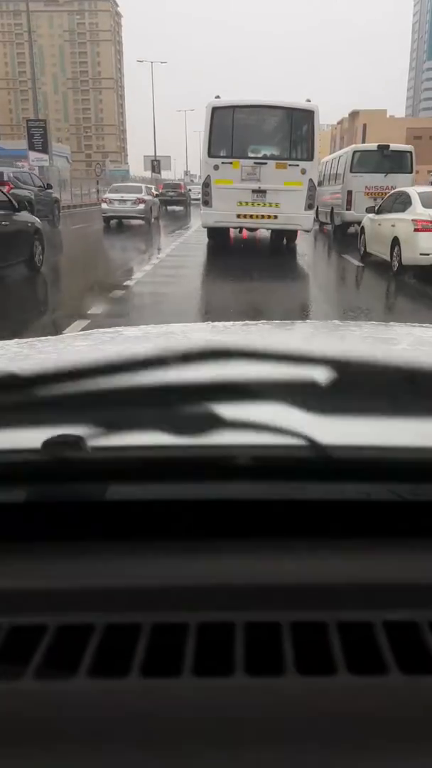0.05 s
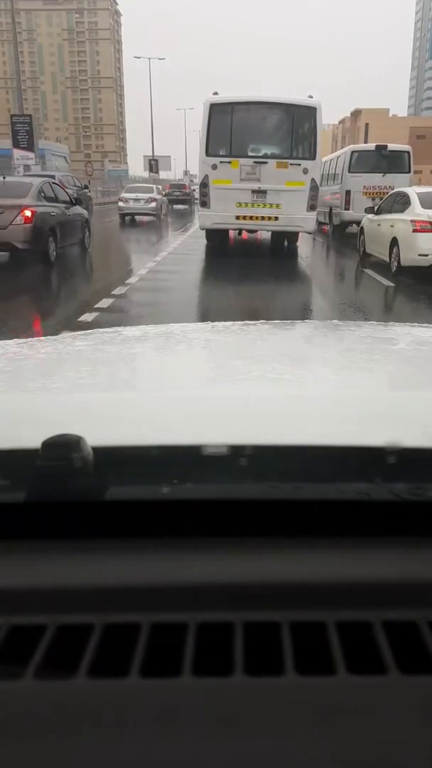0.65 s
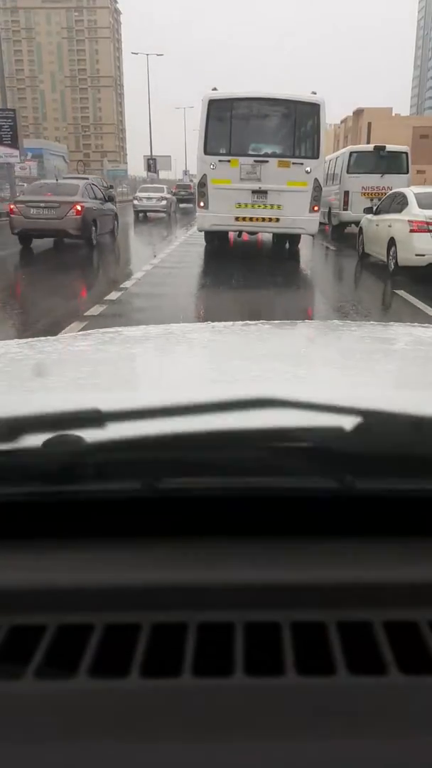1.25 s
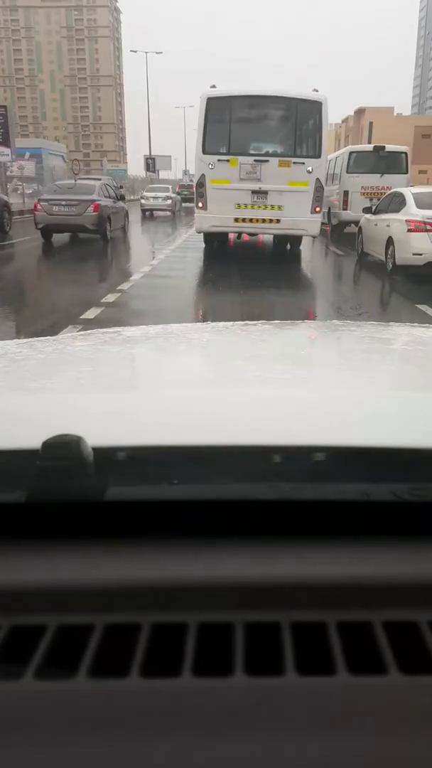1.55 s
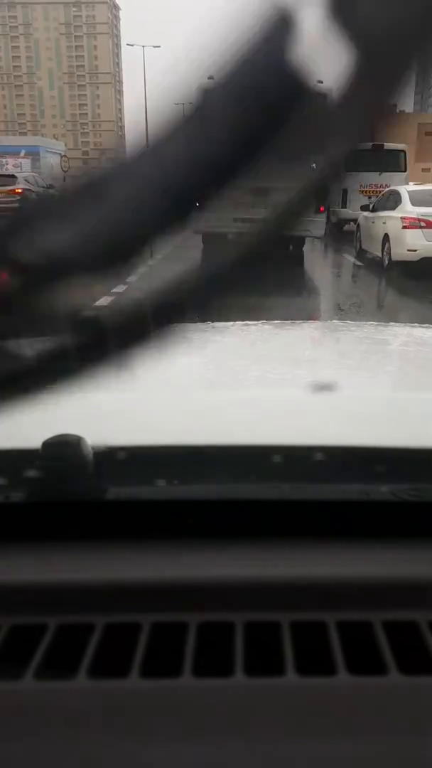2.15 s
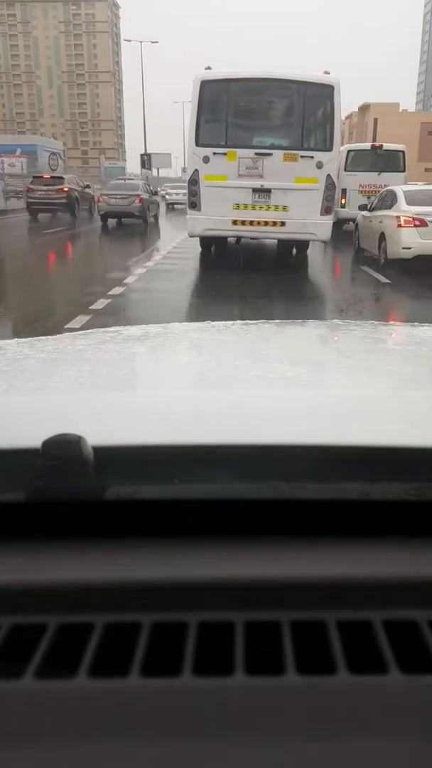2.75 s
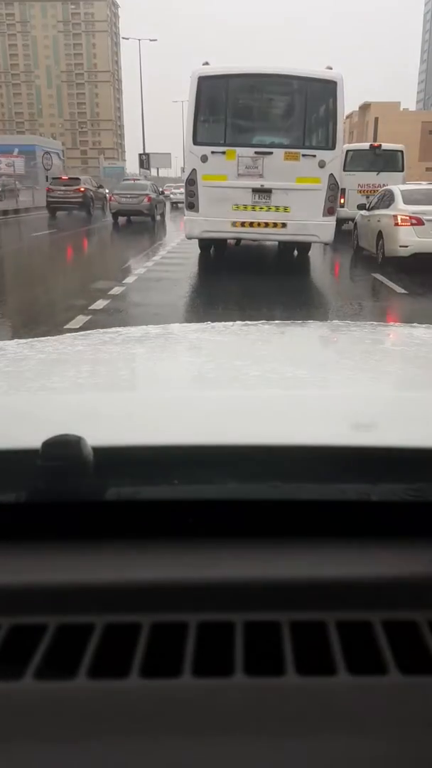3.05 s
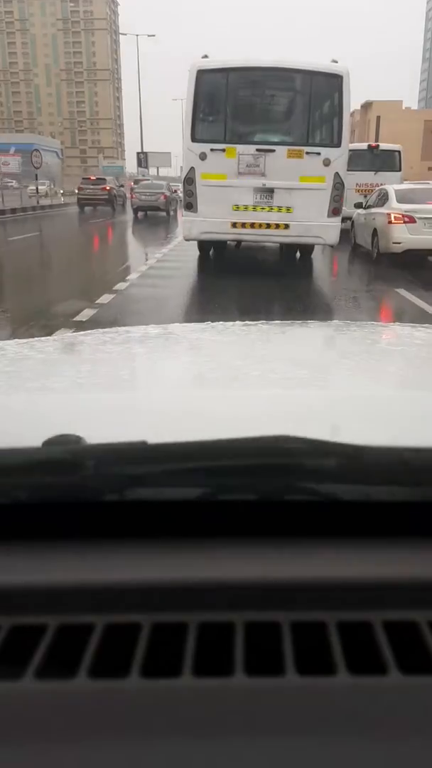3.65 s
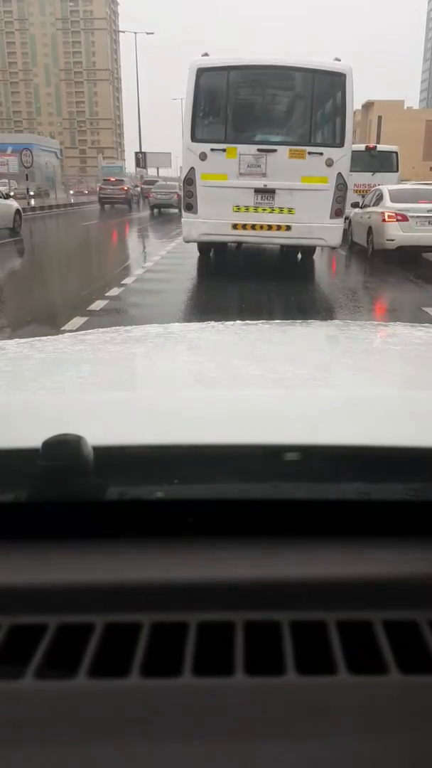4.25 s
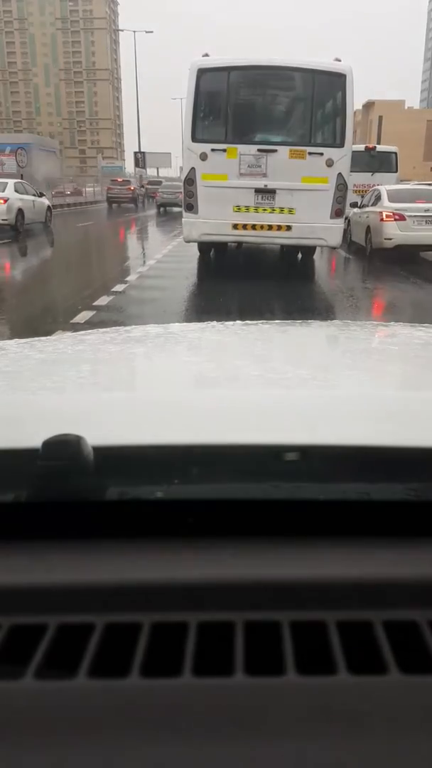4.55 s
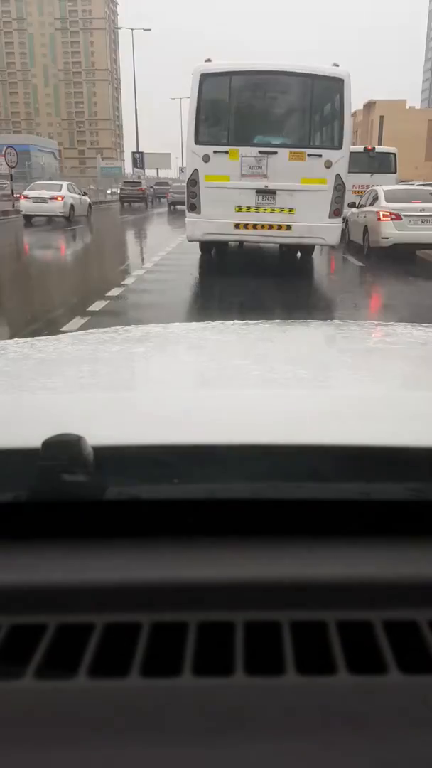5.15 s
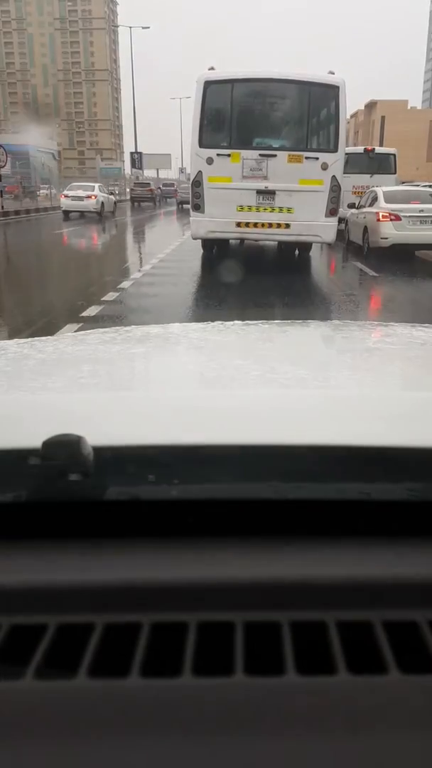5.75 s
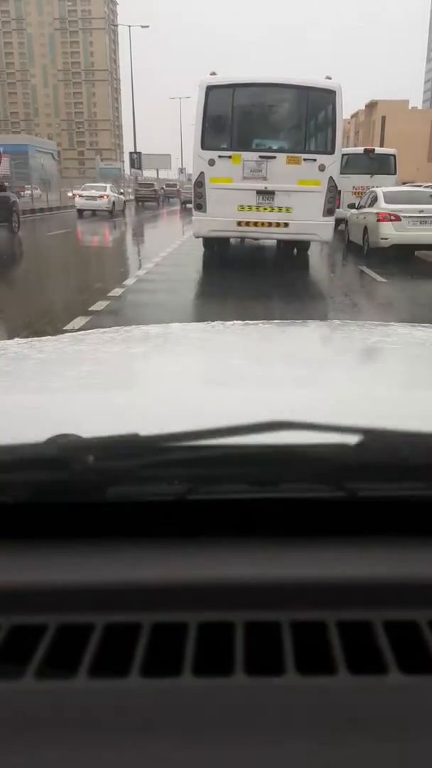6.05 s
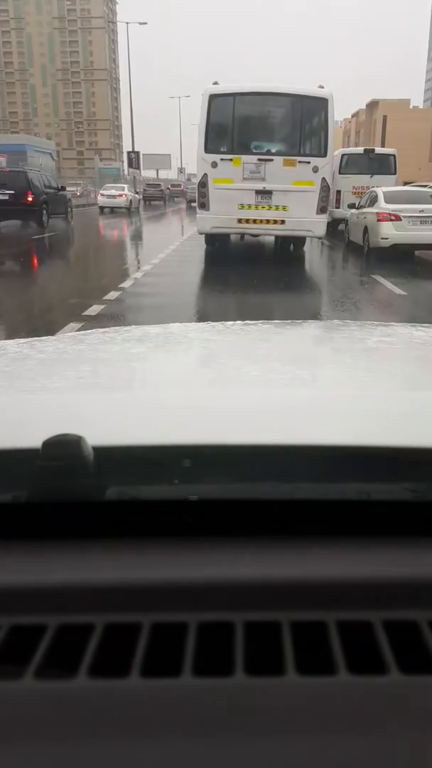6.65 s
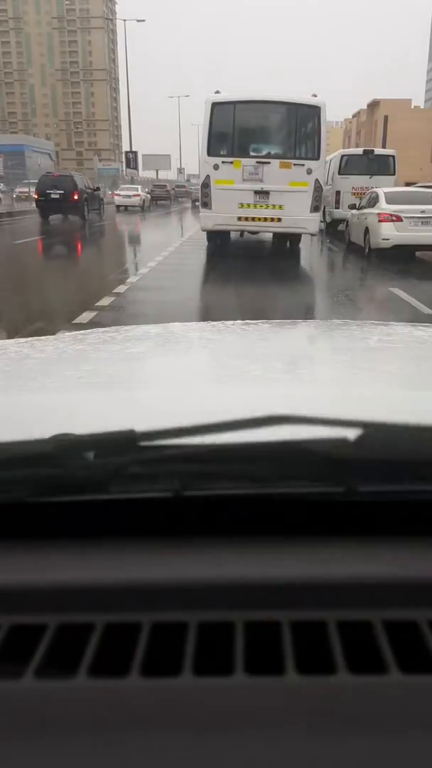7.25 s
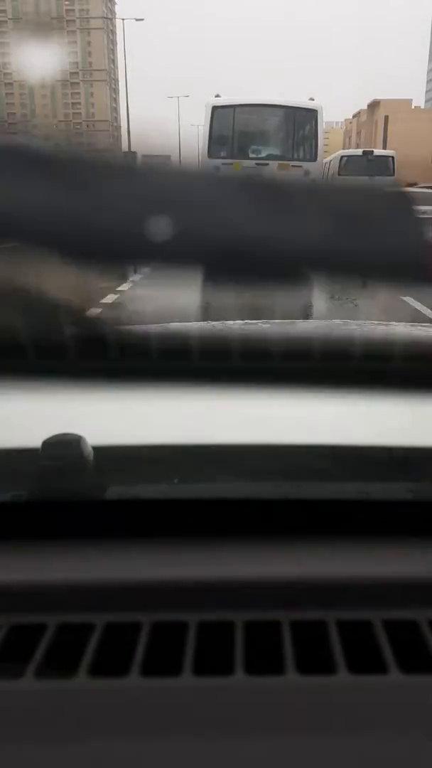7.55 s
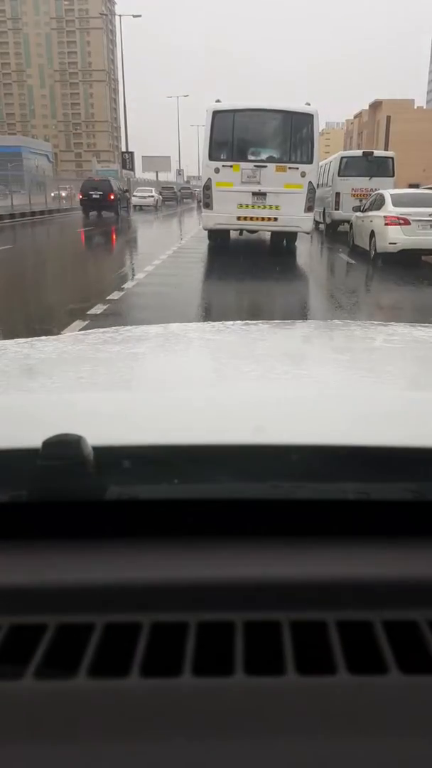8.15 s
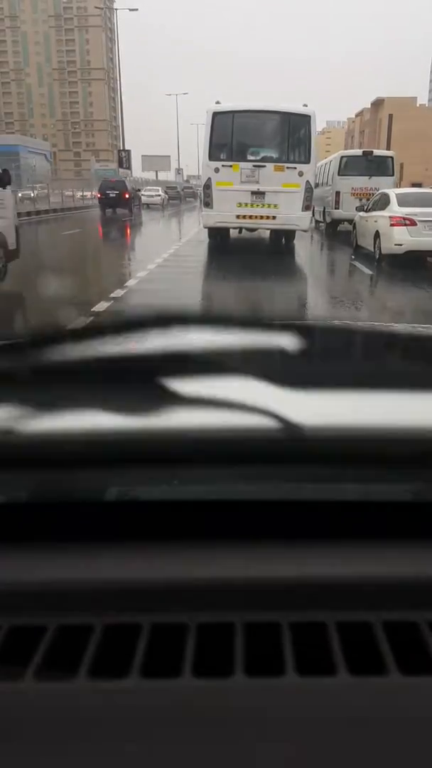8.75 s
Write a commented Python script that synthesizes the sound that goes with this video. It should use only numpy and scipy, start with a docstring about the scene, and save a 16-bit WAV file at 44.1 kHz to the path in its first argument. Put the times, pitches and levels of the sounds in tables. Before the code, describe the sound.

Inside a car creeping through rainy traffic, windscreen wipers swing steadily, with a tick and two knocks at the top of each sweep and a soft double thump at the bottom. Rain washes over the roof and single drops tick on the glass. Early on, plastic clacks sharply twice, then two heavy drops strike with a low ring. A deep rumble, tyre roar and faint whine run underneath, all heard from the dashboard.

```python
"""Windscreen wipers swing every 1.24 s, heard at the dashboard of a car creeping through rainy traffic.
Their rubber blades flip over and push on the glass: a tick and two knocks at the top of each sweep,
a soft double thump at the bottom. Rain washes over roof and glass, and single drops tick close by.
Plastic clacks sharply twice, then two heavy drops strike the car with a low ring.
Underneath, the car body booms on the road, the tyres roar and the drivetrain whines faintly."""
import sys
import numpy as np
from scipy import signal
from scipy.fft import rfft, irfft, next_fast_len
from scipy.io import wavfile

SR = 44100
rng = np.random.default_rng(int(sys.argv[2]) if len(sys.argv) > 2 else 0)


def int16_out(signal):
    """Quantize to a 16-bit WAV file."""
    q = np.round(np.clip(np.atleast_2d(signal).T, -1, 1) * 32767)
    wavfile.write(sys.argv[1], SR, q.astype(np.int16))


N = 392931
TIME = np.arange(N) / SR

# Levels in the tables are relative. A t60 is the time a sound takes to die away by 60 dB.
# one row per sweep: linkage tick/dB, force of first blade/dB, of second blade/dB,
# force at the bottom/dB, lag of second blade/s
SWEEPS = [(-30, -1, 0.5, -1.5, .085), (-27.5, 0.5, 2, -1, .083), (-33, -1, .5, 0, .091),
          (-29, -1, -2, -1, .084), (-28.5, 1, 0, 1, .087), (-29, 1, 0.5, -0.5, .085),
          (-32.5, -3, -1, -2.5, .086)]
# notes the windscreen and the panel below it ring at: f/Hz, t60/s, top push/dB, bottom push/dB
SCREEN_NOTES = [(79, 0.17, -1.5, -0.5), (110.1, 0.24, 4, -1.5), (136.5, 0.24, 0, 0.5),
                (162.3, 0.13, -1.5, -1), (231.3, 0.24, -8.5, -13), (304, 0.26, -5.5, -13),
                (352, 0.099, -17, -0.5), (406, 0.046, -49, -20), (592, 0.069, -4.5, -24),
                (706, 0.12, -2, -8)]
# tone colours, or how strong a noise is from bass to treble: f/Hz, level/dB
TICK_TONE = [(300, 2), (1200, -0.5), (2200, -3), (3000, -3), (4200, -7), (7000, -21), (15000, -34)]  # wiper linkage
SLAP_TONE = [(60, 14), (150, 6), (330, 3), (550, -5), (800, -17.5), (1400, -16), (3000, -33), (9000, -56)]  # blade flipping over
RUB_TONE = [(100, 6), (200, -1.5), (380, 0), (600, -8), (800, -16), (1200, -18.5), (4000, -64)]  # wet rubber on glass
WASH_TONE = [(200, -27), (600, -2), (1100, -0.5), (1800, -1.5), (2700, 0), (3600, -4), (5000, -10.5),
             (7000, -18.5), (15000, -21)]  # rain on the roof
SPRAY_TONE = [(1000, -21), (4000, 2), (7000, 1.5), (10000, -1), (13000, 1), (16000, -25)]  # fine rain on the glass
TAP_TONE = [(200, 16), (700, 0), (1600, 4.5), (3000, -0.5), (5000, -9.5), (8000, -17.5), (15000, -28)]  # drop striking
SPATTER_TONE = [(1000, -22), (4500, 8), (7500, 0), (10500, 1.5), (16000, 2.5)]  # drop bursting
TINK_TONE = [(2000, -38), (7500, -16), (11000, -3), (16000, -5)]  # tiny droplet
TYRE_TONE = [(20, -11), (45, -9), (75, 4.5), (92, -0.5), (108, 2), (150, -9.5), (230, -10), (300, -16),
             (400, -19), (560, -26), (900, -28.5), (1500, -49.5), (3000, -93)]  # tyres on the wet road
# pitches that a part rings at and makes louder: f/Hz, width/Hz, boost/dB
LINKAGE_RINGS = [(2580, 220, 10), (3060, 340, 9.5), (3750, 240, 0)]
ARM_RINGS = [(510, 130, 1.5), (820, 110, 4.5)]  # hollow wiper arms
PANEL_RINGS = [(870, 14, 9), (1104, 85, 4), (1446, 550, 4.5), (1906, 62, 5), (2237, 25, 7),
               (2580, 110, 5.5), (3280, 500, 2.5)]  # glass and roof under the rain
GLASS_RING = [(4650, 390, 1.5)]  # windscreen under a close drop
# strength of the rain on the roof and on the glass: t/s, level/dB
WASH_LEVEL = [(0.0, -50), (2.38, -51), (2.73, -51.5), (3.05, -49.5), (7.84, -53), (8.19, -51),
              (8.91, -51.5)]
SPRAY_LEVEL = [(0.0, -65), (0.62, -67), (1.71, -61.5), (2.53, -65.5), (4.05, -63.5), (4.62, -70.5),
               (6.4, -72), (7.02, -67.5), (8.91, -68.5)]
# big drops on the glass: t/s, spatter/dB, tap/dB
BIG_DROPS = [(0.138, -49, -62), (0.463, -50, -59), (0.5262, -43, -47), (0.649, -42, -47.5),
             (0.85, -39.5, -43.5), (1.3852, -39.5, -43.5), (1.4902, -37, -41), (2.9462, -38, -40.5),
             (3.2117, -43, -45.5), (3.7902, -43, -43.5), (5.17, -48, -45), (5.9372, -53, -43),
             (6.5164, -48, -46), (6.8558, -47, -53), (7.8427, -58, -47.5), (8.297, -46, -45)]
# heavy drops with a longer splash: t/s, tap/dB, spatter/dB
SPLASHES = [(2.344, -34.5, -43), (2.398, -37.5, -46), (2.478, -44.5, -44.5), (2.668, -39, -52),
            (3.039, -37, -34.5)]
# tiny droplets: t/s, level/dB, f/Hz
TINKS = [(1.428, -43, 9900), (1.515, -44, 12900), (6.982, -37, 11300), (7.213, -44, 10300)]
# two plastic clacks, then the low ring of two heavy drops: t/s, level/dB, f/Hz, muffled above/Hz, t60/s
CLACKS_AND_DROP_RINGS = [(2.106, -26, 2540, 9000, 0.034), (2.159, -26.5, 2130, 2880, 0.031),
                         (3.046, -41.5, 1200, 2500, 0.35), (3.215, -44.5, 860, 3000, 0.23)]
# slow swell of the body's boom: t/s, level/dB
BOOM_LEVEL = [(0, -20), (0.35, -30), (1.1, -20.5), (1.65, -28.5), (2.05, -21), (2.75, -27.5), (3.1, -23),
              (4.1, -24.5), (4.6, -20), (5.7, -24), (6.05, -24), (6.7, -22), (7.4, -24), (8.1, -21),
              (8.5, -28.5), (8.91, -24)]
# pitch of the boom: t/s, f/Hz
BOOM_PITCH = [(0, 49.6), (1.2, 47.8), (3.6, 49.3), (4.7, 42.5), (6.7, 42.7), (7.5, 52.1), (8.91, 50.7)]
# moments when the boom holds one steady note: t/s, length/s, f/Hz, level/dB
DRONES = [(0.622, 0.34, 45.24, -18.5), (6.841, 0.318, 44, -16)]
# glides of the drivetrain whine: t/s, length/s, first f/Hz, last f/Hz, level/dB
WHINE_GLIDES = [(-.1, 0.56, 255, 240, -40.5), (2.6, 0.504, 429, 395, -46), (3.632, 0.42, 345, 385, -42.5),
                (4.582, .5, 468, 345, -42), (7.051, .75, 212, 248.4, -39.5), (7.75, .9, 252, 232, -43)]
# how alike left and right sound: f/Hz, likeness (1 = the same, 0 = unrelated)
STEREO_LIKENESS = [(40, 0.94), (80, 0.59), (130, 0.92), (290, 0.94), (640, 0.97), (1100, 0.013),
                   (3000, -0.053), (15000, -0.011)]
# balance of the microphone's two openings: f/Hz, left minus right/dB
STEREO_BALANCE = [(40, -0.5), (200, 1.1), (2000, 0.5), (3000, -1), (4500, -2.5), (6500, -2.5), (9500, 4),
                  (13000, -0.5), (16000, -2)]

FIRST_TURN_S, SWEEP_S = .4988, 1.2437
FIRST_BLADE_S, BOTTOM_S = .0075, .6865  # counted from the tick at the top


def wipers():
    """At each turn the rubber blades flip over and push on the glass."""
    top_push, top_sound = top_turn()
    bottom_push, bottom_sound = bottom_turn()
    return windscreen(top_push, bottom_push) + top_sound + bottom_sound


def top_turn():
    """The linkage ticks, then each blade knocks over. Gives (push on the glass, sound in the air)."""
    tick_db, first_db, second_db, _, lag_s = np.transpose(SWEEPS)
    ticks = bursts(each_sweep(0, tick_db), crack_t60=0.036, tail_t60=0.056, tail_db=-29)
    tick = noise(TICK_TONE, LINKAGE_RINGS) * soften(ticks, 0.00021)
    knocks = each_sweep(FIRST_BLADE_S, first_db - 25.5) + each_sweep(lag_s, second_db - 26.5)
    # the second blade drags just before its flip, and its arm settles just after
    drag = bursts(each_sweep(lag_s - 0.011, second_db - 21.5), crack_t60=0.075, tail_t60=0.21, tail_db=-14)
    settle = landing(lag_s + 0.02815, second_db - 24.5, skip_s=0.00935, skip_db=1, contact_s=0.0016)
    flips = each_sweep(FIRST_BLADE_S, first_db - 18.5) + each_sweep(lag_s, second_db - 21.5)
    slaps = bursts(flips, crack_t60=0.09, tail_t60=0.17, tail_db=-6.5)
    rubber = (soften(slaps, 0.001) + soften(drag, 0.00095)) * noise(SLAP_TONE, ARM_RINGS)
    return soften(knocks, 0.00038) + settle, rubber + lean_left(tick, 1.7)


def bottom_turn():
    """The blades brush through gathered water and land one after the other. Gives (push, sound)."""
    _, _, _, force_db, _ = np.transpose(SWEEPS)
    push = landing(BOTTOM_S - .002, force_db - 18, skip_s=0.01057, skip_db=2.0, contact_s=0.0011)
    push += landing(BOTTOM_S + .034, force_db - 19, skip_s=0.01014, skip_db=0.5, contact_s=0.0017)
    flip = bursts(each_sweep(BOTTOM_S, force_db - 25.5), crack_t60=0.091, tail_t60=0.14, tail_db=-22)
    water_hits = each_sweep(BOTTOM_S - 0.07, force_db - 36.5)
    brush = bursts(water_hits, crack_t60=0.37, tail_t60=0.27, tail_db=4)
    return push, (soften(flip, 0.0023) + soften(brush, 0.0019)) * noise(RUB_TONE)


def landing(after_s, level_db, skip_s, skip_db, contact_s):
    """A rubber edge touches down, skips once and lands again."""
    touches = each_sweep(after_s, level_db) + each_sweep(after_s + skip_s, level_db + skip_db)
    return soften(touches, contact_s)


def each_sweep(after_s, level_db):
    """One hit in every sweep, a set time after the top turn."""
    return clicks(FIRST_TURN_S + SWEEP_S * np.arange(len(SWEEPS)) + after_s, from_db(level_db))


def windscreen(top_push, bottom_push):
    """The glass rings with each push; where the push lands sets the mix of notes."""
    out = 0
    for hz, t60, top_db, bottom_db in SCREEN_NOTES:
        push = top_push * from_db(top_db) + bottom_push * from_db(bottom_db)
        note = ring(push * from_db(2.5 * drift(2.5)), hz, t60)
        # a copy a quarter wave ahead makes the note reach the left a little early
        ahead = np.gradient(note) * SR / (2 * np.pi * hz)
        out = out + note + from_db(-9) * ahead * [[1], [-1]]
    return lean_left(out, .5)


def rain(wash_db, spray_db):
    """Countless drops blur into a wash through the roof lining; on the glass they patter in flurries."""
    roof_drops = shower(per_s=970, spread_db=1.5)
    roof = rms_one(bursts(roof_drops, crack_t60=0.014, tail_t60=0.12, tail_db=-6.5))
    wash = from_db(wash_db + 3.5) * roof * noise(WASH_TONE, PANEL_RINGS)
    flurry = from_db(0.42 * drift(17))
    glass_drops = bursts(shower(per_s=120, spread_db=3.6), crack_t60=0.0024, tail_t60=0.054, tail_db=-25)
    glass = rms_one(flurry * soften(glass_drops, 0.00016))
    patter = glass * (from_db(1.5) * noise(SPRAY_TONE) + from_db(-1) * noise(TAP_TONE, PANEL_RINGS))
    hiss = from_db(0.5 + .5 * drift(14)) * noise(SPRAY_TONE)
    return wash + from_db(spray_db - 0.5) * (patter + hiss)


def close_drops(spray_db):
    """Each close drop taps the glass and throws a bright spatter; medium ones fall at random."""
    tap, spatter = noise(TAP_TONE, GLASS_RING), noise(SPATTER_TONE)
    medium_drops = shower(per_s=5, spread_db=0) * from_db(spray_db)
    times, spatter_db, tap_db = np.transpose(BIG_DROPS)
    tap_hits = clicks(times, from_db(tap_db)) + from_db(13.5) * medium_drops
    spatter_hits = clicks(times, from_db(spatter_db)) + from_db(17.5) * medium_drops
    taps = bursts(tap_hits, crack_t60=0.025, tail_t60=0.1, tail_db=-7)
    spatters = soften(bursts(spatter_hits, crack_t60=0.0044, tail_t60=0.056, tail_db=-10), 0.000073)
    return from_db(11) * tap * taps + from_db(5.5) * spatter * spatters + splashes(tap, spatter)


def splashes(tap, spatter):
    """Heavy drops burst with the same two noises, but start more softly and last longer."""
    times, tap_db, spatter_db = np.transpose(SPLASHES)
    taps = bursts(clicks(times, from_db(tap_db + 2.5)), crack_t60=0.15, tail_t60=0.15, tail_db=-1)
    spatter_hits = clicks(times, from_db(spatter_db + 4.5))
    spatters = bursts(spatter_hits, crack_t60=0.042, tail_t60=0.09, tail_db=-17)
    return tap * soften(taps, 0.00079) + spatter * soften(spatters, 0.00076)


def tinks():
    """The smallest drops give only a very high, short ring."""
    out = 0
    for start, level_db, hz in TINKS:
        hit = clicks([start], from_db([level_db + 8.5]))
        fade = bursts(hit, crack_t60=0.0046, tail_t60=0.07, tail_db=-19)
        out = out + fade * noise(TINK_TONE, rings=[(hz, 1800, 9)])
    return out


def clacks_and_drop_rings():
    """Two sharp plastic clacks, then two heavy drops striking the car: each one ring over dull noise."""
    dull_tone = [(200, 0.5), (750, 3.5), (1500, -3), (3000, -8.5), (4500, -26), (15000, -23)]
    out = 0
    for start, level_db, hz, edge_hz, t60 in CLACKS_AND_DROP_RINGS:
        hit = clicks([start], from_db([level_db + 3.5]))
        fade = bursts(hit, crack_t60=t60, tail_t60=0.17, tail_db=-12.5)
        out = out + muffle(fade * noise(dull_tone, rings=[(hz, 600, 8)]), edge_hz)
    return lean_left(out, 1.3)


def body_boom():
    """The road shakes the cabin's lowest note into a random throb; twice it settles into a drone."""
    shake = muffle(rng.standard_normal((2, N + SR)), edge_hz=8.15)[:, SR:]  # sets how fast it throbs
    phase = 2 * np.pi * np.cumsum(over_time(BOOM_PITCH)) / SR
    throb = rms_one(shake[0] * np.cos(phase) + shake[1] * np.sin(phase))
    out = from_db(over_time(BOOM_LEVEL) + 0.5) * throb
    for start, length, hz, level_db in DRONES:
        hold = swell(start, length, fade_s=0.058)
        drone = from_db(level_db) * np.sqrt(2) * np.sin(2 * np.pi * (hz * TIME + rng.random()))
        out = out * (1 - hold) + hold * drone
    return muffle(out, edge_hz=96)


def tyre_roar():
    """Tyres on the wet road make a low, gently wavering roar."""
    return from_db(-33.5 + 1.18 * drift(2.44)) * noise(TYRE_TONE)


def drivetrain_whine():
    """The drivetrain whines in short glides, made rough by trembling pitch and loudness."""
    out, tremble = 0, 1 + .017 * drift(25.4)
    for start, length, first_hz, last_hz, level_db in WHINE_GLIDES:
        hz = np.interp(TIME, [start, start + length], [first_hz, last_hz]) * tremble
        tone = np.sin(2 * np.pi * np.cumsum(hz) / SR)
        out = out + from_db(level_db) * swell(start, length, fade_s=.13) * tone
    return out * rms_one(1 + 0.93 * drift(22))


def from_db(db):
    """Turn decibels into a number to multiply by."""
    return 10 ** (np.asarray(db) / 20)


def rms_one(x):
    """Scale a signal to an average strength (rms) of 1."""
    return x / np.sqrt(np.mean(x ** 2) + 1e-20)


def lean_left(x, db):
    """Turn the left side up and the right side down, each by db."""
    return x * from_db([[db], [-db]])


def muffle(x, edge_hz):
    """Weaken everything above edge_hz."""
    return signal.sosfilt(signal.butter(2, edge_hz, fs=SR, output="sos"), x)


def over_time(points):
    """Join a table's points into a curve over time."""
    return np.interp(TIME, *np.transpose(points))


def at_hz(points, hz):
    """Read a table between its frequencies, with octaves evenly spaced."""
    f, value = np.transpose(points)
    return np.interp(np.log(hz + 1), np.log(f), value)


def swell(start, length, fade_s):
    """Fade in, hold, fade out."""
    return np.sin(np.pi / 2 * np.clip(np.minimum(TIME - start, start + length - TIME) / fade_s, 0, 1))


def drift(rate_hz):
    """A smooth random wobble, about 1 in size."""
    step = 40  # samples between random values
    decay = np.exp(-2 * np.pi * rate_hz * step / SR)
    slow = signal.lfilter([1], [1, -2 * decay, decay ** 2], rng.standard_normal(N // step + 2002))[2000:]
    return np.interp(np.arange(N) / step, np.arange(len(slow)), rms_one(slow))


def noise(tone, rings=()):
    """Stereo noise with a tone colour: left and right are alike in the bass, unrelated in the treble."""
    size = next_fast_len(N)
    hz = np.arange(size // 2 + 1) * SR / size
    mid, side = rfft(rng.standard_normal((2, size)))
    alike = np.clip(at_hz(STEREO_LIKENESS, hz), -1, 1)
    pair = np.sqrt(1 + alike) * mid + np.sqrt(1 - alike) * side * [[1], [-1]]
    peaks_db = sum(boost_db / (1 + (2 * (hz - centre) / width) ** 2) for centre, width, boost_db in rings)
    gain = from_db(at_hz(tone, hz) + peaks_db + at_hz(STEREO_BALANCE, hz) * [[.5], [-.5]])
    return rms_one(irfft(pair * gain, size)[:, :N])


def clicks(times, sizes):
    """A one-sample spike for each hit."""
    out = np.zeros(N)
    np.add.at(out, np.clip(np.round(np.asarray(times) * SR).astype(int), 0, N - 1), sizes)
    return out


def shower(per_s, spread_db):
    """Drops at random moments; more spread makes a few much larger than the rest."""
    sizes = from_db(spread_db * np.minimum(rng.exponential(1, N), 4.5))
    return sizes * (rng.random(N) < per_s / SR)


def ring(force, hz, t60):
    """Each click starts a pure note that dies away."""
    decay, angle = from_db(-60 / (t60 * SR)), 2 * np.pi * hz / SR
    return signal.lfilter([0, np.sin(angle)], [1, -2 * decay * np.cos(angle), decay ** 2], force + 1e-18)


def soften(x, contact_s):
    """Spread each click over time, as a softer touch would."""
    decay = np.exp(-1 / (contact_s * SR))
    return signal.lfilter([(1 - decay) ** 2], [1, -2 * decay, decay ** 2], x + 1e-18)


def bursts(hits, crack_t60, tail_t60, tail_db):
    """How loud hits are over time: a crack plus the cabin's short echo."""
    energy = hits ** 2 + 1e-18
    crack, tail = (signal.lfilter([1], [1, -from_db(-120 / (t60 * SR))], energy)
                   for t60 in (crack_t60, tail_t60))
    return np.sqrt(crack + from_db(tail_db) ** 2 * tail)


def scene():
    """Wipers, rain and road as they meet at the dashboard."""
    wash_db, spray_db = over_time(WASH_LEVEL), over_time(SPRAY_LEVEL)
    road = body_boom() + drivetrain_whine() + tyre_roar()
    water = rain(wash_db, spray_db) + close_drops(spray_db) + tinks()
    return road + water + clacks_and_drop_rings() + wipers()


def record(dry):
    """The microphone loses the deepest bass, and the highest treble is cut."""
    thinned = signal.sosfilt(signal.butter(2, 24, "high", fs=SR, output="sos"), dry)
    return signal.sosfilt(signal.ellip(10, .1, 90, 15600, fs=SR, output="sos"), thinned)


dry = scene()
out = record(dry)
int16_out(out)
```